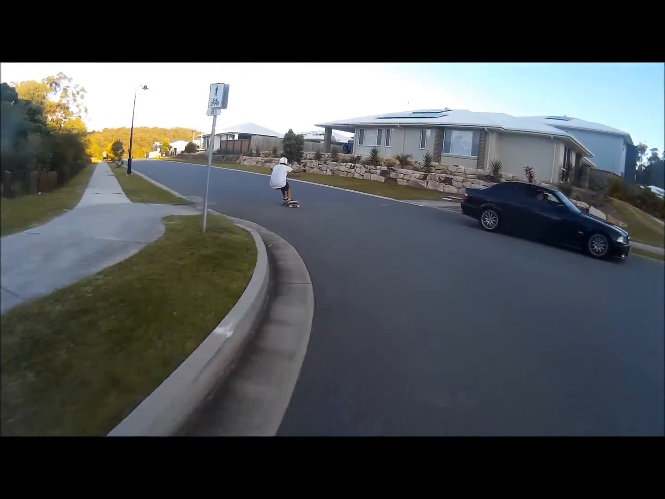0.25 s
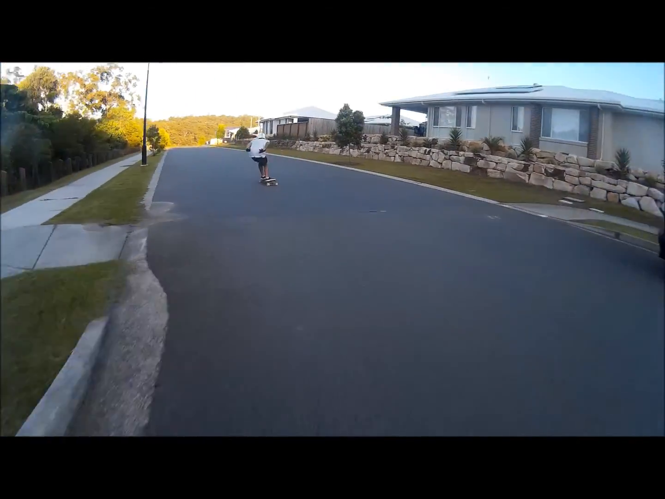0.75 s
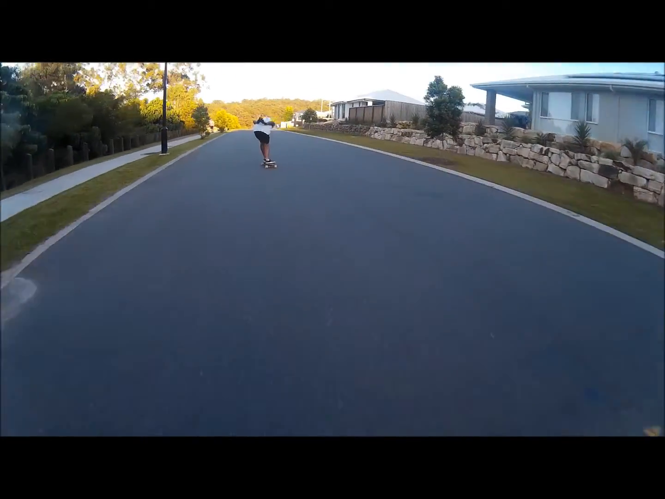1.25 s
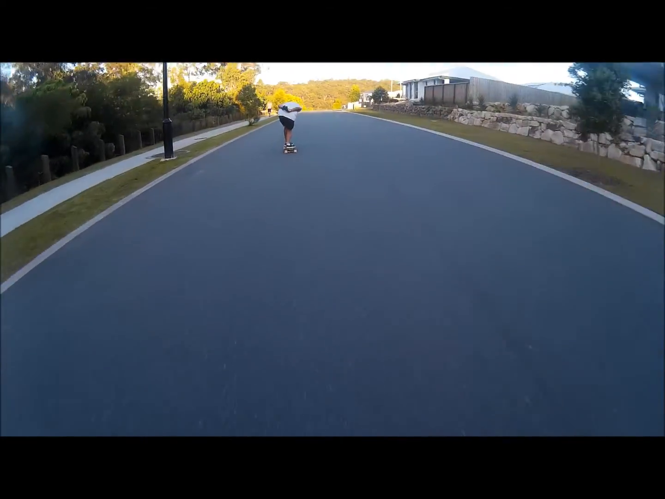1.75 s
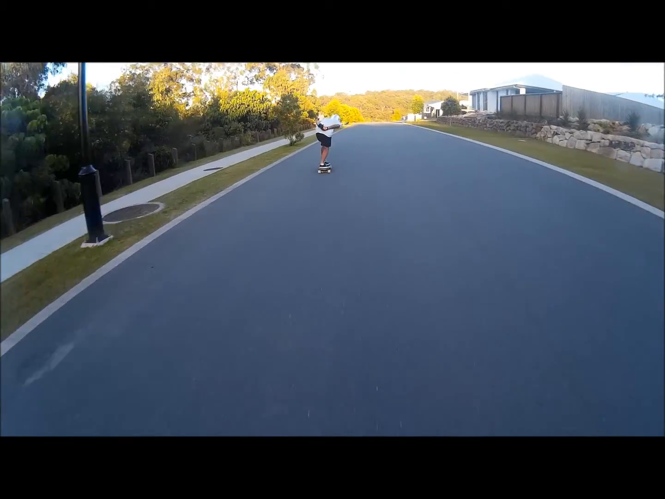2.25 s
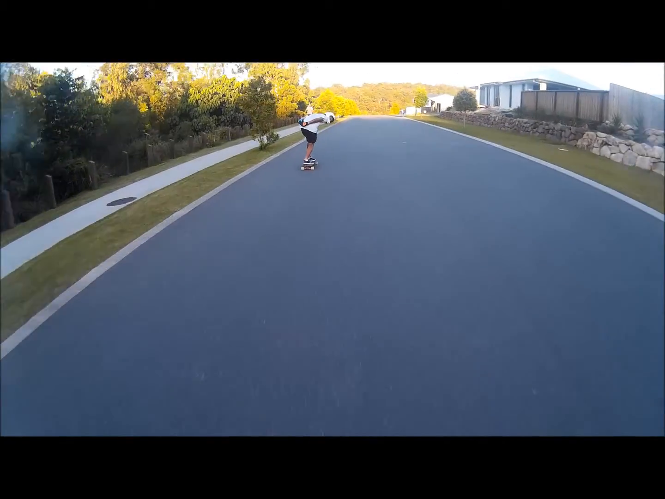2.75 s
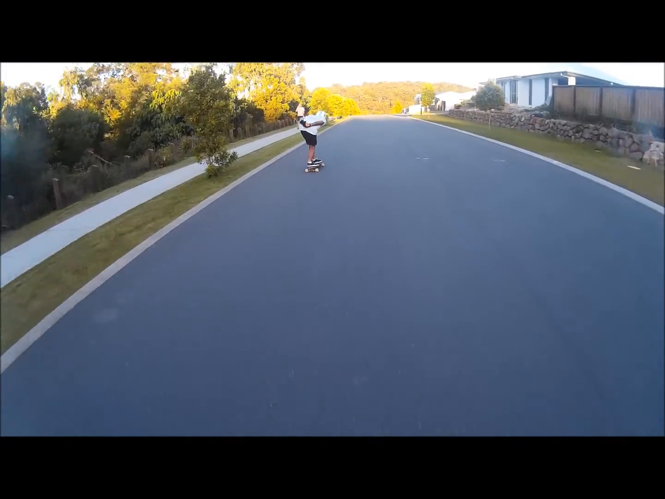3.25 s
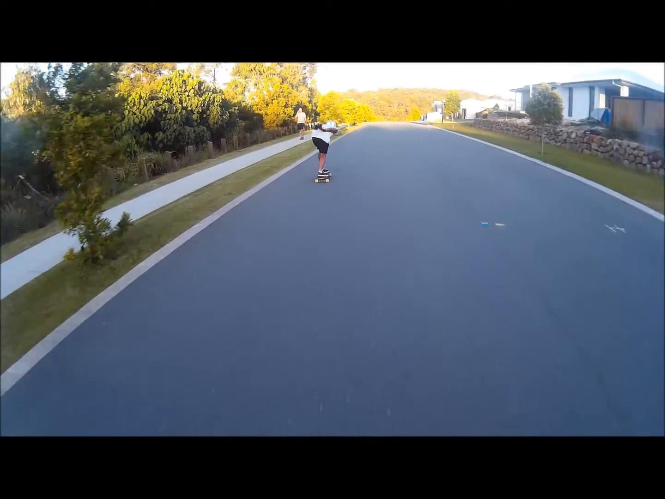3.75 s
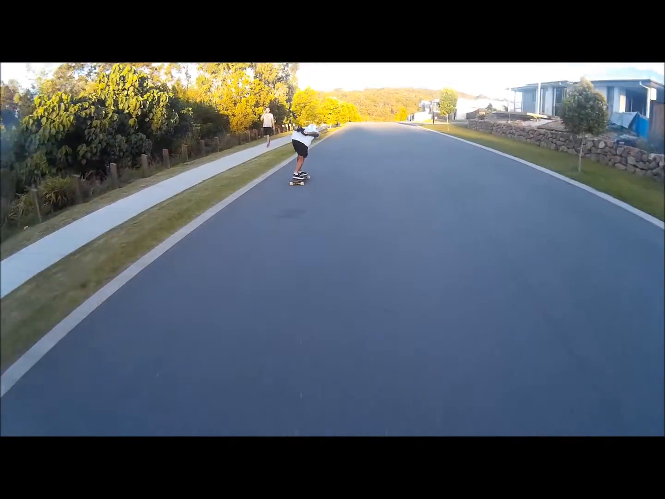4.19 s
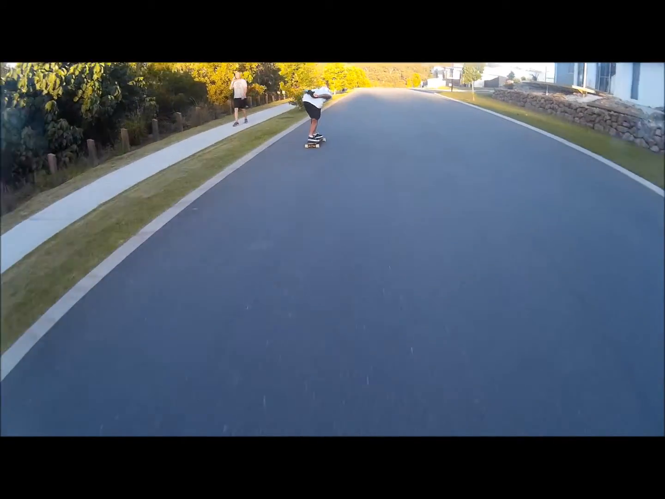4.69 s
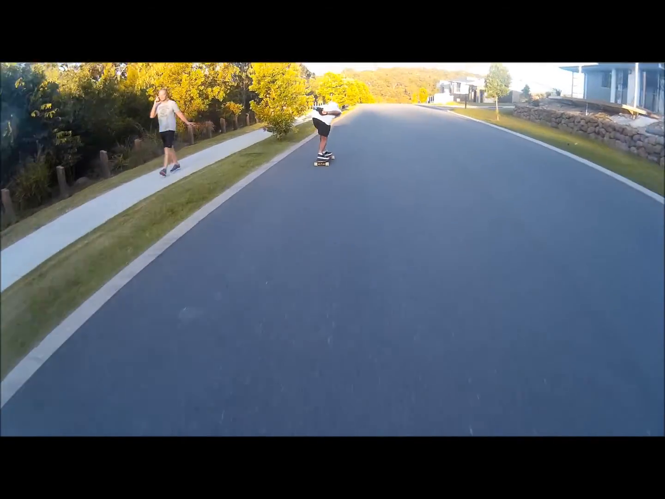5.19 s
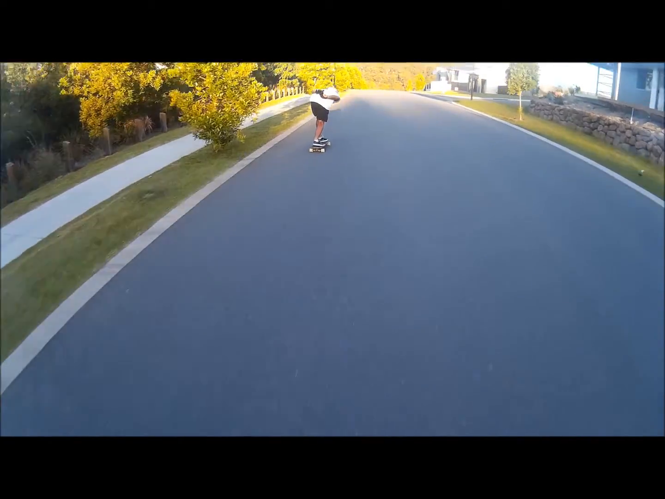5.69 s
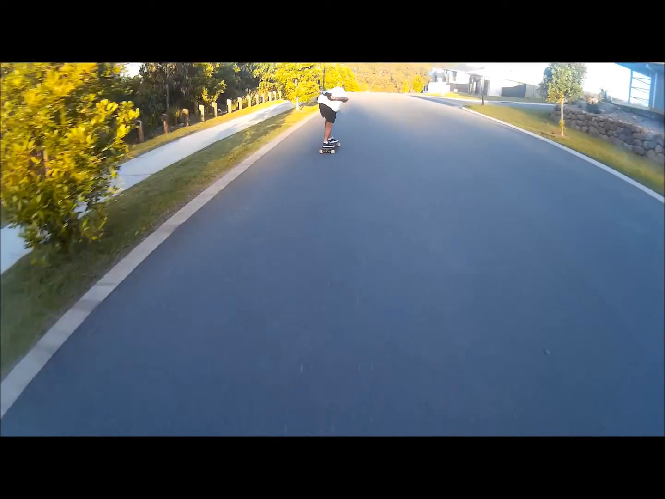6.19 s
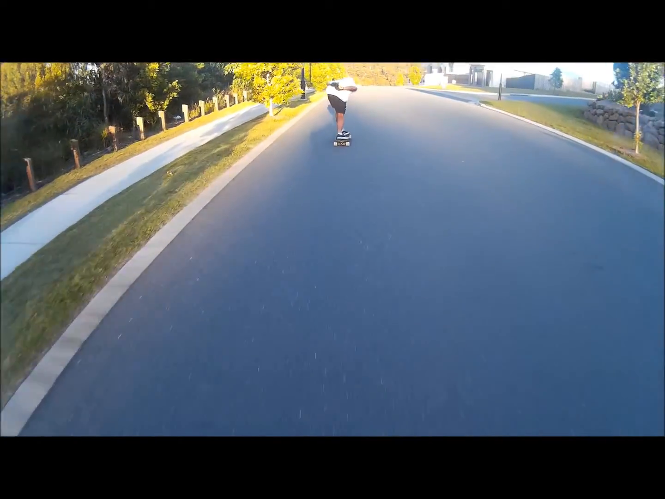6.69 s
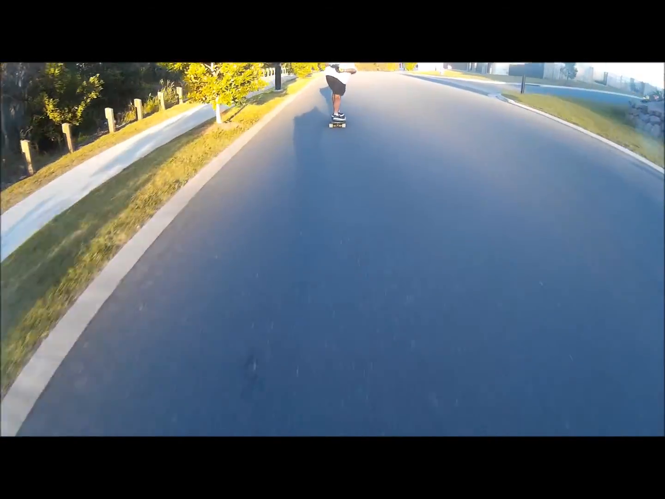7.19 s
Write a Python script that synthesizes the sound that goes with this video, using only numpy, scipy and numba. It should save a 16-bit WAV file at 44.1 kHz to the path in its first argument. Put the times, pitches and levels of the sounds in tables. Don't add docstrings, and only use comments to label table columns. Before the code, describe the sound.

Downhill longboard ride on an open suburban street, captured very close by a microphone shut in a plastic case. Grainy boxy wheel roar and irregular deep wind buffets fade from strong to moderate over an even faint hiss. One faint tick, then fumbling plastic knocks and loose chatter twice in quick succession, the second harsh and clipped with a short springy ring. Afterwards the sound ducks, recovers and continues as soft rolling.

```python
import sys
import numpy as np
from scipy import signal
from scipy.fft import rfft, irfft
from scipy.io import wavfile
from scipy.ndimage import uniform_filter1d
from numba import njit

SR = 44100
rng = np.random.default_rng(int(sys.argv[2]) if len(sys.argv) > 2 else 0)


def ratio_of_db(decibels):
    return 10 ** (np.asarray(decibels, float) / 20)


def unload_audio(sound):
    columns = np.transpose(np.atleast_2d(sound))
    steps = np.round(np.clip(columns, -1, 1) * 32767)
    wavfile.write(sys.argv[1], SR, steps.astype(np.int16))


N = 328104

# (frequency [Hz], width [Hz], level [dB])
LOW_CAVITY_MODES = [(366, 70.5, -4), (498.5, 69.6, 0), (590.5, 71, -3.5), (720, 159, -6.5)]
# (frequency [Hz], width [Hz], level [dB])
HIGH_CAVITY_MODES = [(876, 98, -14), (960, 74, 3), (1096, 145, -2), (1333, 154, 1), (1762, 388, -9.5),
                     (1940, 247, -9.5), (2130, 190, -11.5), (2440, 570, -39.5), (3046, 490, -23.5),
                     (3334, 410, -28.5), (3680, 320, -32.5), (4113, 290, -30.5), (4610, 650, -31.5)]
# (frequency [Hz], width [Hz], level [dB])
BUFFET_MODES = [(54.3, 13.6, -2.5), (38.1, 20, -8), (78, 30, -19)]
# (frequency [Hz], width [Hz], level [dB])
BODY_MODES = [(79.6, 28, -4.5), (136, 92, -4), (188.8, 45.4, 3.5), (272.4, 77, -1.5)]
# (frequency [Hz], level [dB], time to fall 60 dB [s])
SHELL_MODES = [(326, -2, 0.056), (434, -3.5, 0.053), (754, -10.5, 0.04), (853, -8.5, 0.03),
               (1150, -15, 0.0089), (1330, -23, .035), (1900, -31, .04), (2040, -27, .03), (3050, -26, .02),
               (4200, -32, .015)]
# (frequency [Hz], level [dB], time to fall 60 dB [s])
MOUNT_MODES = [(60, 0.0048, 0.2)]
# (frequency [Hz], level [dB], time to fall 60 dB [s])
LATCH_MODES = [(393, 4, 0.19), (1050, -12, 0.11), (1303, 7.5, 0.073), (1764, 15.5, 0.025),
               (1874, -2, 0.038), (315.4, 12.5, 0.1), (682, 9.5, 0.038), (516, 13.5, 0.045)]
# (frequency [Hz], level [dB], time to fall 60 dB [s])
SPRING_MODES = [(1592, -31, 0.29), (2073, -17.5, 0.11), (2094, -27, .07), (2200, -30, 0.046),
                (2440, -49, .2)]
# (frequency [Hz], level [dB], time to fall 60 dB [s])
LENS_PORT_MODES = [(3040, -33, 0.018), (4020, -37, .018), (2130, -37, 0.018), (5100, -46, .012),
                   (3550, -46, .008)]
# (time [s], level [dB])
ROAD_LEVEL = [(0, -35), (.6, -34), (.8, -34), (1.15, -33.5), (1.42, -35), (1.5, -39), (1.85, -39),
              (2.0, -37.5), (2.2, -39.5), (2.4, -42), (2.85, -42), (3.1, -40), (3.72, -39.5), (3.9, -42.5),
              (5.55, -40.5), (5.68, -44.5), (6.25, -43.5), (7.44, -43.5)]
# (time [s], level [dB])
GUST_LEVEL = [(0, -34), (.17, -36), (.45, -40.5), (.8, -38), (1.15, -41), (1.4, -38), (1.9, -43.5),
              (2.14, -38.5), (2.3, -46.5), (2.75, -48), (2.92, -38), (3.08, -49), (3.3, -42), (3.52, -47.5),
              (4.0, -41.5), (5.8, -52), (6.75, -47.5), (7.44, -49.5)]
# (frequency [Hz], level [dB])
HISS_COLOR = [(5500, 0.5), (13900, 0), (14700, -2.5), (15500, -1.5)]
# (time [s], level [dB], rise [ms], length [ms], brightness [dB per octave])
CHATTER = [(4.4453, -27, 0.32, 10, 6), (4.453, -24.5, 2.5, 16, 1.5), (4.534, -20.5, 5.7, 24, 0.5),
           (4.5385, -36, .5, 2.8, 5), (4.546, -26.5, 0.76, 5.5, 2), (4.5636, -30, 0.81, 3.4, 1),
           (4.5739, -17.5, 1.7, 13, 0.5), (4.5896, -32.5, 0.45, 2.2, 5.5), (4.599, -32, 0.52, 2.2, 5.5),
           (4.6789, -19.5, 1.7, 5.4, -0.5), (4.6967, -4, 0.29, 9.7, 3.5), (4.7085, -7, 0.56, 6.2, 1.5)]
# (time [s],
# shell level [dB], door frequency [Hz], door level [dB], mount level [dB])
BLOWS = [(4.4479, 2, 141, -1, -15.5), (4.4586, -10, 198, -11, -15), (4.4814, -17, 62, -35, -12.5),
         (4.5412, -4.5, 112, -11.5, -8), (4.5512, -15, 99, -17, -21.5), (4.5602, -7, 115, -25, -20.5),
         (4.5713, -16, 109, -0.5, -9), (4.5895, -0.5, 126, -11.5, -17),
         (4.6806, -30, 120.3, -1, -16.5), (4.6836, -3, 123, -21, -27), (4.6962, 4.5, 160, -4.5, -22),
         (4.702, 4, 73, 1, 3), (4.71, 5, 148.6, -17.5, -21), (4.735, -25, 111, -13, -38),
         (4.776, -31, 101.5, -17, -10.5), (4.814, -40, 60, -29, -23)]
# (time [s], level [dB])
LATCH_STROKES = [
    (4.6967, -12),
    (4.7083, -18),
]


def unit(x):
    return x / np.sqrt(np.mean(x ** 2))


def resonate(x, modes, order):
    out = 0
    for k, (hz, width_hz, db) in enumerate(modes):
        edges_hz = [hz - width_hz / 2, hz + width_hz / 2]
        sos = signal.butter(order, edges_hz, "band", fs=SR, output="sos")
        out = out + (-1) ** k * ratio_of_db(db) * signal.sosfilt(sos, x)
    return out


def settled(x, modes, order):
    with_run_up = np.concatenate([x[-SR // 4:], x])
    return unit(resonate(with_run_up, modes, order)[-N:])


def ring(x, modes):
    out = 0
    for hz, db, t60_s in modes:
        pole = np.exp(2j * np.pi * hz / SR - np.log(1000) / (t60_s * SR))
        out = out + ratio_of_db(db) * signal.lfilter([1], [1, -pole], x + 1e-18).imag
    return out


def walk(rate_hz):
    hold = int(SR / rate_hz)
    steps = np.repeat(rng.standard_normal(N // hold + 1), hold)
    return unit(uniform_filter1d(uniform_filter1d(steps, hold), hold)[:N])


def curve(points):
    return np.interp(np.arange(N) / SR, *np.transpose(points))


def place(out, start_s, sound):
    start = int(start_s * SR)
    out[start:start + len(sound)] += sound


def half_second_ms():
    return np.arange(SR // 2) * 1000 / SR


def click():
    return 1. * (half_second_ms() == 0)


def rolling(road_db, grit_db):
    patchiness_db = 0.64 * walk(400) + 0.23 * walk(40) + 0.26 * walk(11)
    kicks = rng.standard_normal(N) * ratio_of_db(patchiness_db)
    wall_band = signal.butter(2, [300, 820], "band", fs=SR, output="sos")
    low = settled(signal.sosfilt(wall_band, kicks), LOW_CAVITY_MODES, order=1)
    high = settled(kicks, HIGH_CAVITY_MODES, order=2) * ratio_of_db(0.22 * walk(5.8))
    return ratio_of_db(road_db) * low + ratio_of_db(grit_db) * high


def wind(buffet_db, body_db):
    buffet_push = rng.standard_normal(N) * ratio_of_db(1.46 * walk(8.3))
    body_push = rng.standard_normal(N) * ratio_of_db(1.55 * walk(20))
    buffet = settled(buffet_push, BUFFET_MODES, order=1)
    body = settled(body_push, BODY_MODES, order=2)
    return ratio_of_db(buffet_db) * buffet + ratio_of_db(body_db) * body


def ride():
    t = np.arange(N) / SR
    road_db, gust_db = curve(ROAD_LEVEL), curve(GUST_LEVEL)
    rougher_db = road_db + 40
    windier_db = gust_db + 45
    grit_db = -44 + 0.88 * rougher_db - 0.78 * t
    body_db = -46 + 0.31 * rougher_db + 0.31 * windier_db - 0.84 * t
    return rolling(road_db, grit_db) + wind(gust_db, body_db)


def hiss():
    level_db, top_hz = -71 + 1.6, 15600
    hz, db = np.transpose(HISS_COLOR)
    bins_hz = np.fft.rfftfreq(N, 1 / SR)
    color = ratio_of_db(np.interp(np.log(bins_hz + 1), np.log(hz), db)) * (bins_hz < top_hz)
    return ratio_of_db(level_db) * unit(irfft(rfft(rng.standard_normal(N)) * color, N))


def pebble():
    out = np.zeros(N)
    scrape = np.exp(-half_second_ms() / 0.065) / 3
    place(out, 3.2868, ring(scrape, LENS_PORT_MODES))
    return out


def rattles():
    out, age_ms = np.zeros(N), np.arange(4096) * 1000 / SR
    for start_s, db, rise_ms, length_ms, tilt_db in CHATTER:
        rise = np.clip(age_ms / rise_ms, 0, 1)
        fall = np.exp(-1.5 * (np.maximum(age_ms - rise_ms, 0) / length_ms) ** 2)
        burst = rng.standard_normal(4096) * rise * fall
        tilted_modes = [(hz, 1.12 * width_hz, level_db + tilt_db * np.log2(hz / 500))
                        for hz, width_hz, level_db in HIGH_CAVITY_MODES]
        clack = ratio_of_db(9.0) * resonate(burst, tilted_modes, order=2)
        thump_db = 22.5 + 0.43 * db
        thump = ratio_of_db(thump_db) * resonate(burst, LOW_CAVITY_MODES, order=2)
        place(out, start_s, ratio_of_db(db) * (clack + thump))
    return out


def knocks():
    out, age_ms = np.zeros(N), half_second_ms()
    door_t60_s = 0.1
    for start_s, shell_db, door_hz, door_db, mount_db in BLOWS:
        contact_ms = np.clip(1.29 - 0.45 * shell_db, 0.3, 3.1)
        force = np.sin(np.pi * np.clip(age_ms / contact_ms, 0, 1)) ** 2
        force = force / force.sum()
        door = ring(force, [(door_hz, door_db, door_t60_s)])
        mount = ratio_of_db(mount_db) * ring(force, MOUNT_MODES)
        shell = ratio_of_db(shell_db) * ring(force, SHELL_MODES)
        place(out, start_s, door + mount - shell)
    return out


def latch():
    out = np.zeros(N)
    for start_s, db in LATCH_STROKES:
        place(out, start_s, ratio_of_db(db) * ring(click(), LATCH_MODES))
    place(out, 4.715, ring(click(), SPRING_MODES))
    return out


def scene():
    inside = ride() + pebble() + rattles() + knocks() + latch()
    wall = signal.butter(6, 4710, fs=SR, output="sos")
    run_up = inside[:99][::-1]
    return signal.sosfilt(wall, np.concatenate([run_up, inside]))[99:][None]


@njit
def follow(x, attack, release):
    level, out = 0., np.empty(len(x))
    for i in range(len(x)):
        level += (abs(x[i]) - level) * (attack if abs(x[i]) > level else release)
        out[i] = level
    return out


def top_cut(x):
    return signal.sosfilt(signal.butter(12, 16410, fs=SR, output="sos"), x)


def record(dry):
    attack_s, release_s, lag_s = 0.042, 0.086, 0.021
    top_db, most_duck_db = -21.5, -11
    loud = follow(dry[0], 1 / (attack_s * SR), 1 / (release_s * SR))
    gain = np.clip(ratio_of_db(top_db) / (loud + 1e-9), ratio_of_db(most_duck_db), 1)
    lag = int(lag_s * SR)
    late_gain = uniform_filter1d(np.concatenate([np.ones(lag), gain[:-lag]]), lag)
    mix = np.clip(dry * late_gain + hiss(), -1, 1)
    return top_cut(mix)


dry = scene()
out = record(dry)
unload_audio(out)
```